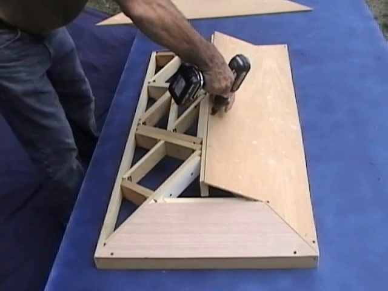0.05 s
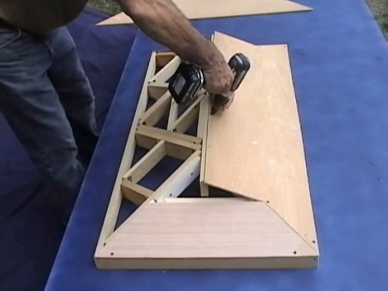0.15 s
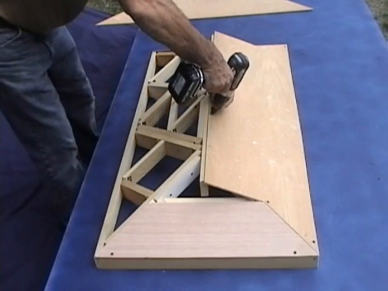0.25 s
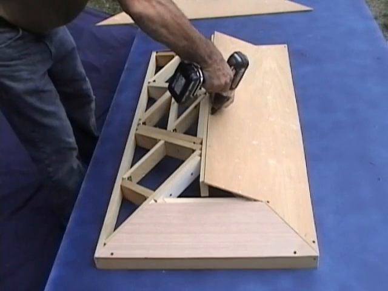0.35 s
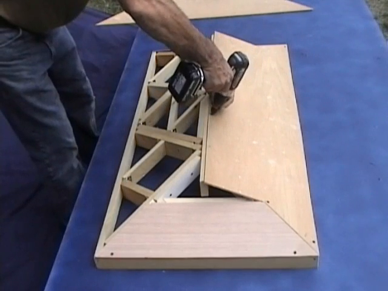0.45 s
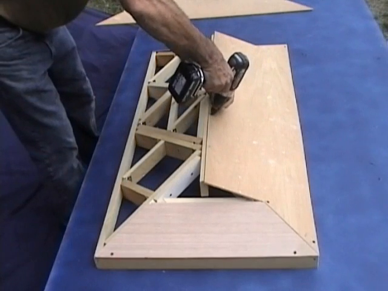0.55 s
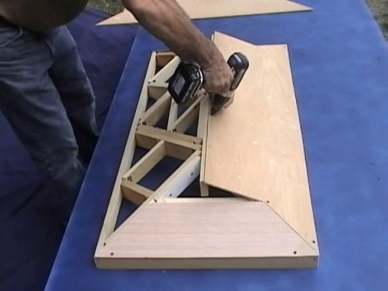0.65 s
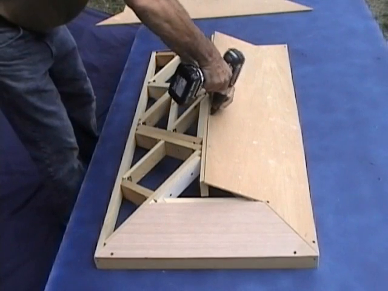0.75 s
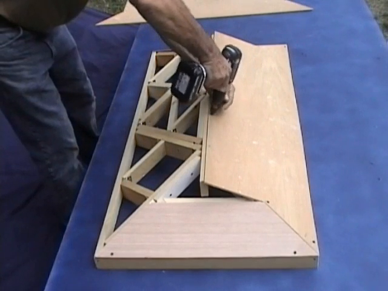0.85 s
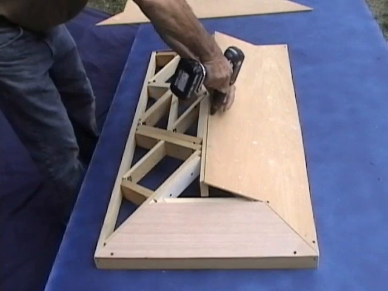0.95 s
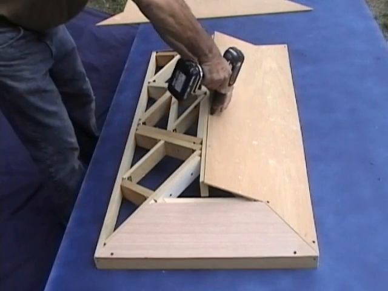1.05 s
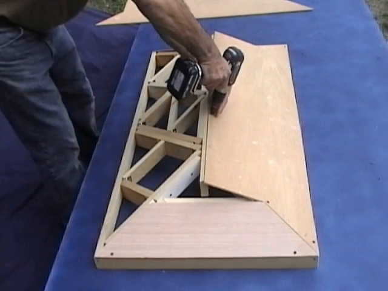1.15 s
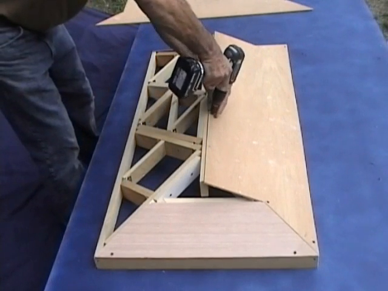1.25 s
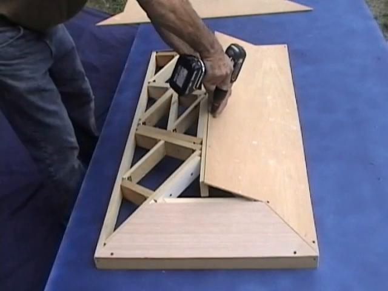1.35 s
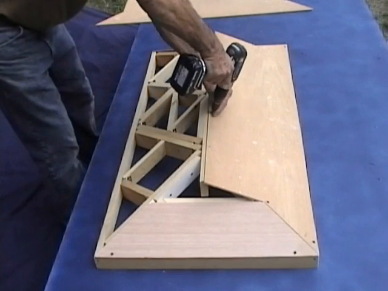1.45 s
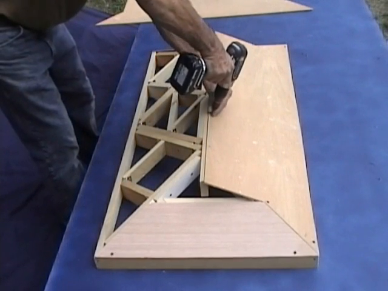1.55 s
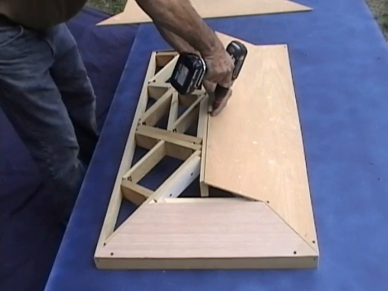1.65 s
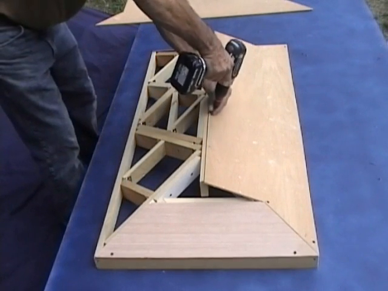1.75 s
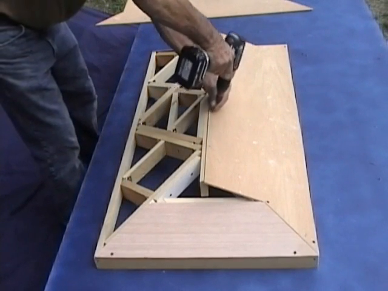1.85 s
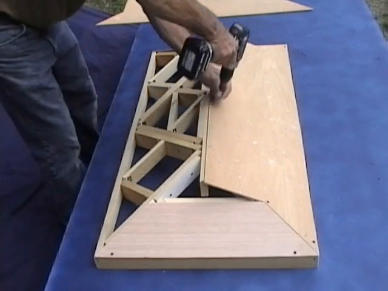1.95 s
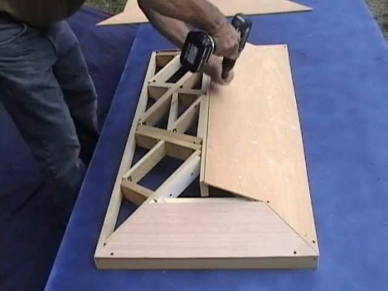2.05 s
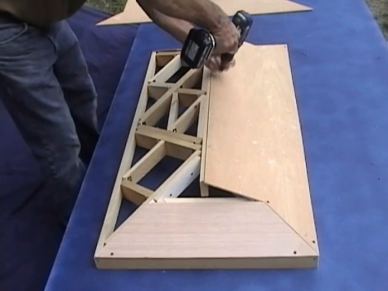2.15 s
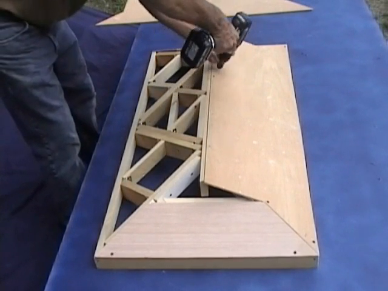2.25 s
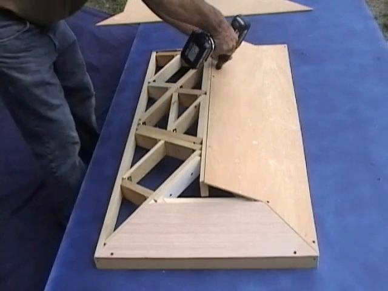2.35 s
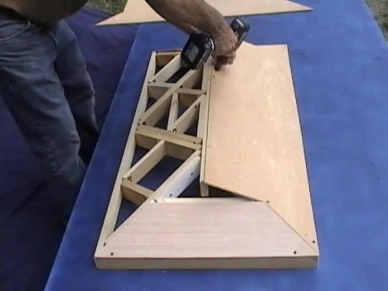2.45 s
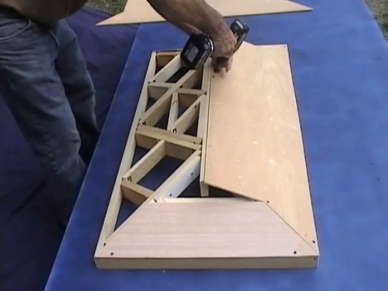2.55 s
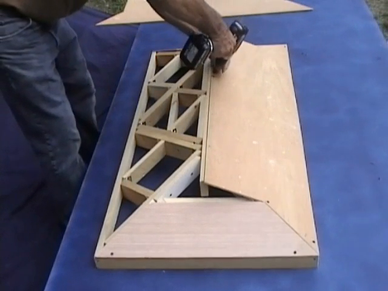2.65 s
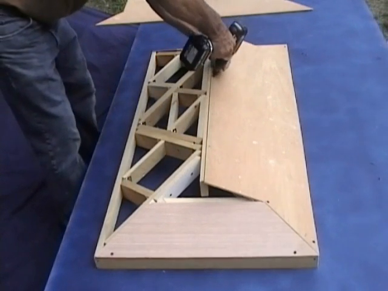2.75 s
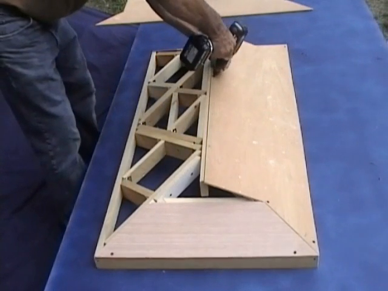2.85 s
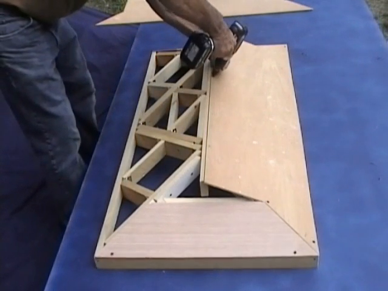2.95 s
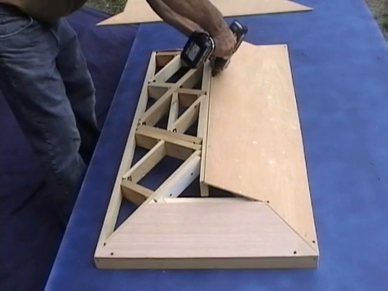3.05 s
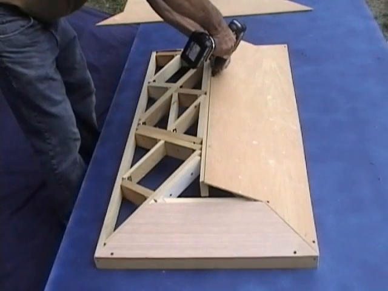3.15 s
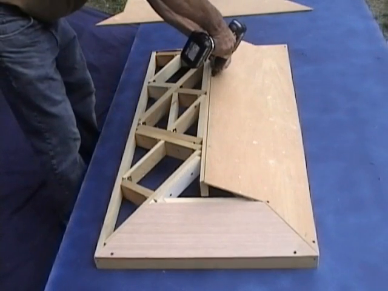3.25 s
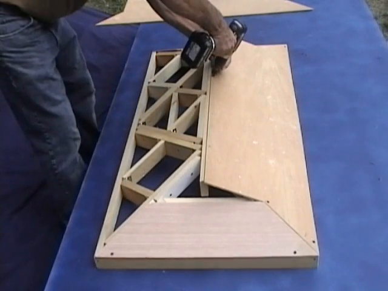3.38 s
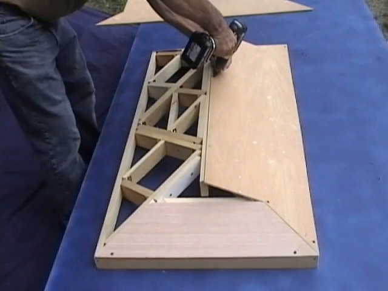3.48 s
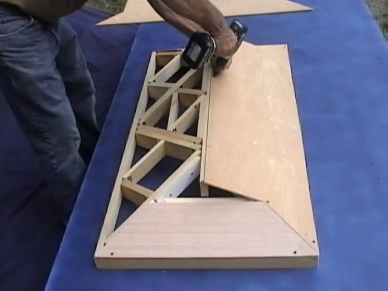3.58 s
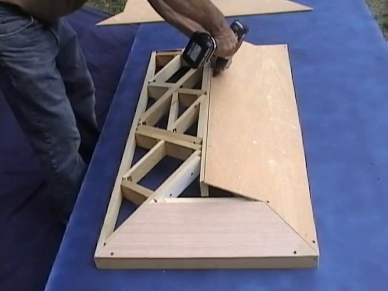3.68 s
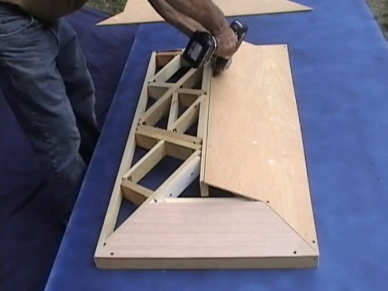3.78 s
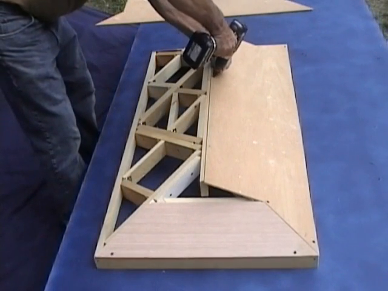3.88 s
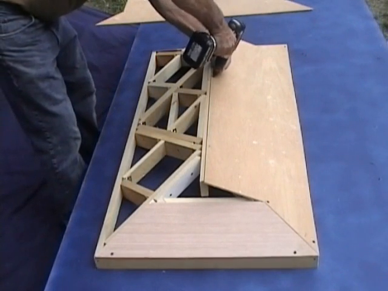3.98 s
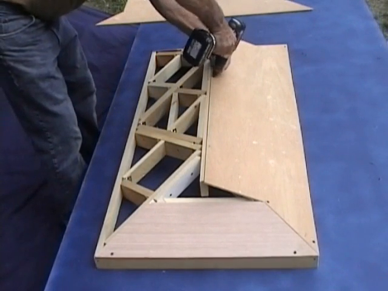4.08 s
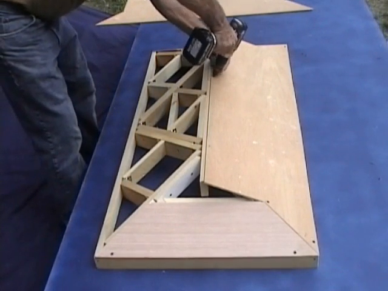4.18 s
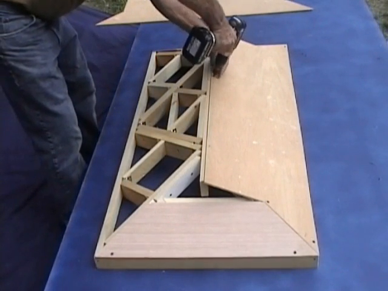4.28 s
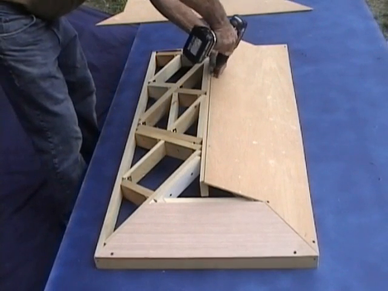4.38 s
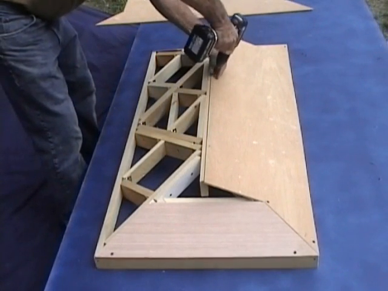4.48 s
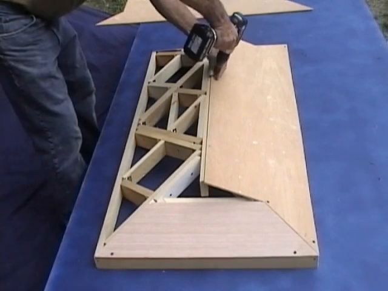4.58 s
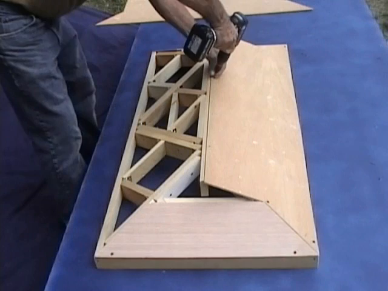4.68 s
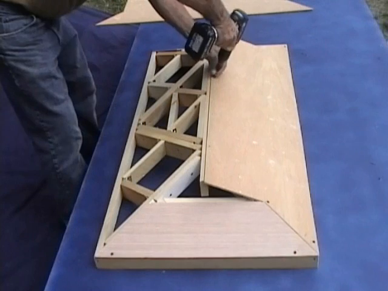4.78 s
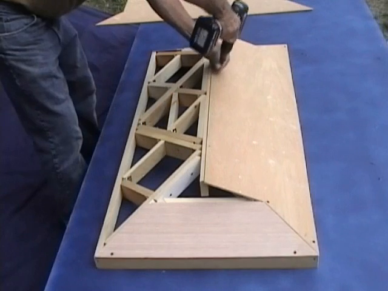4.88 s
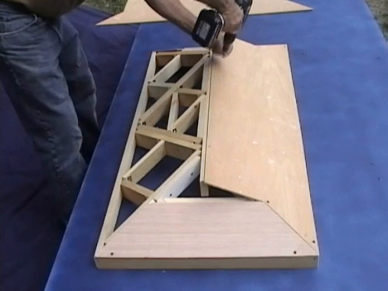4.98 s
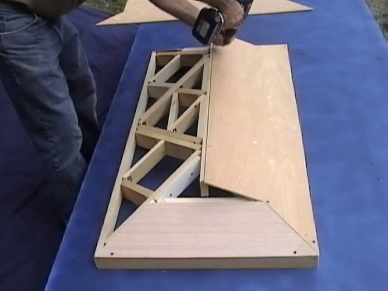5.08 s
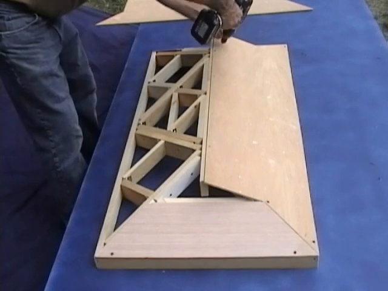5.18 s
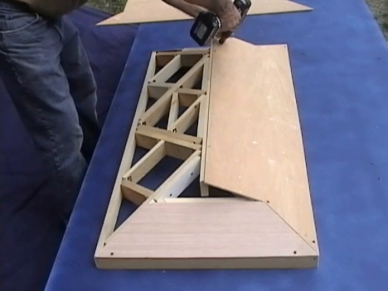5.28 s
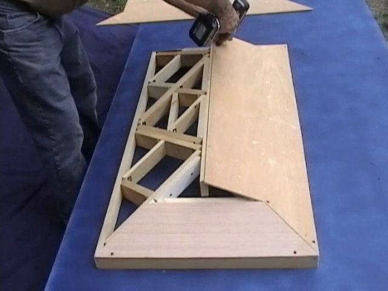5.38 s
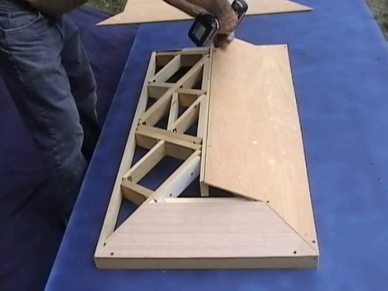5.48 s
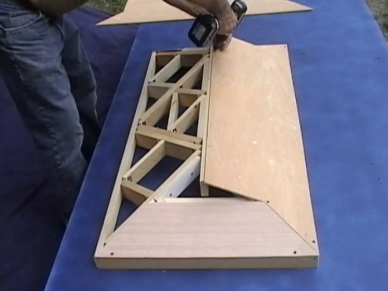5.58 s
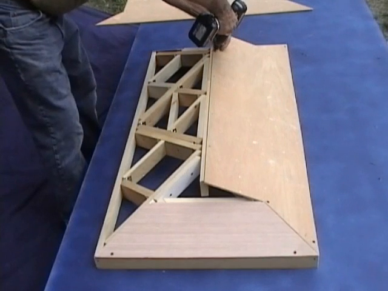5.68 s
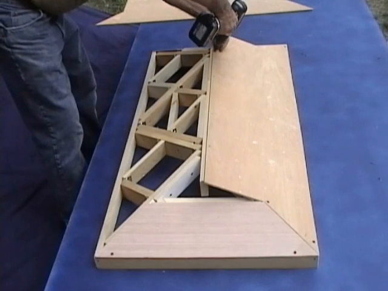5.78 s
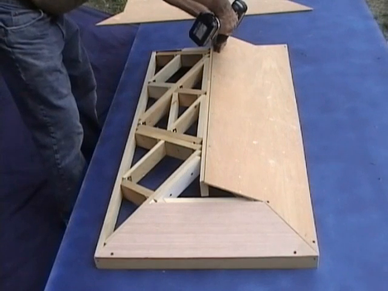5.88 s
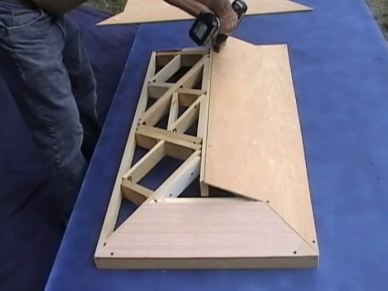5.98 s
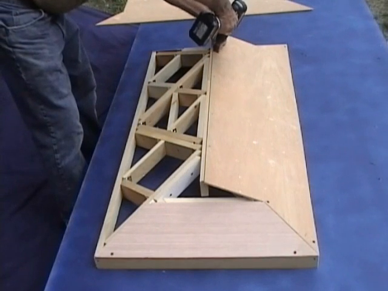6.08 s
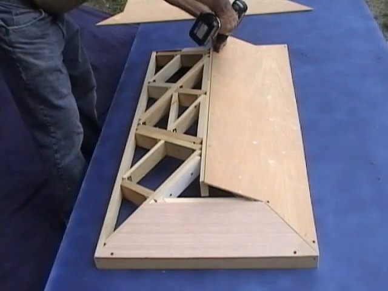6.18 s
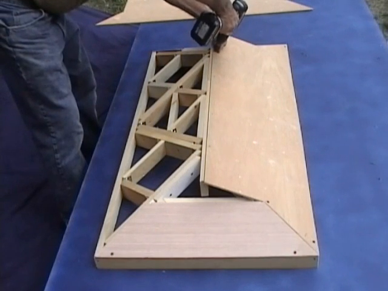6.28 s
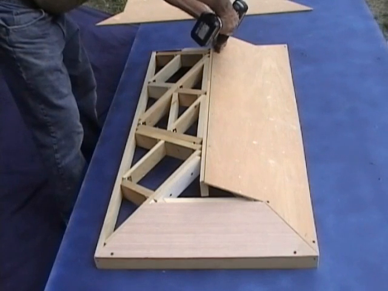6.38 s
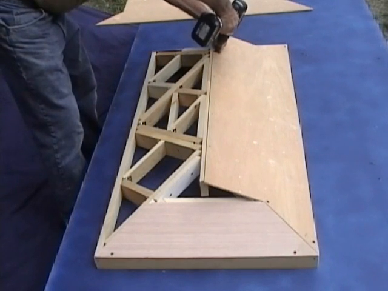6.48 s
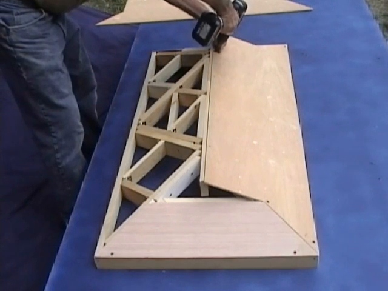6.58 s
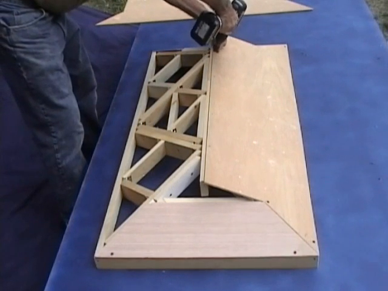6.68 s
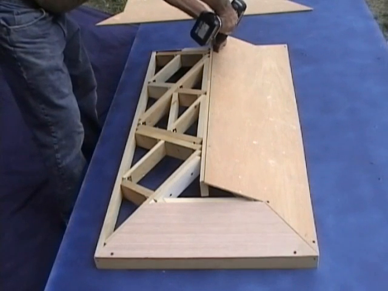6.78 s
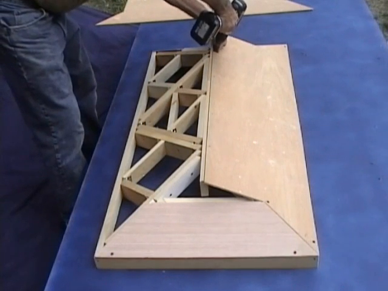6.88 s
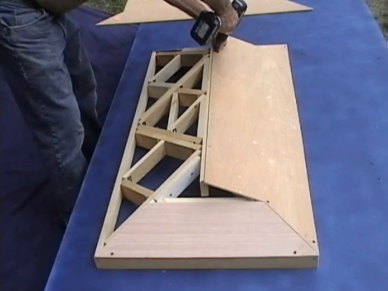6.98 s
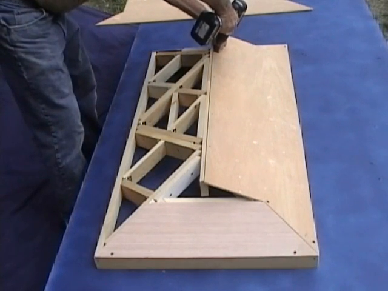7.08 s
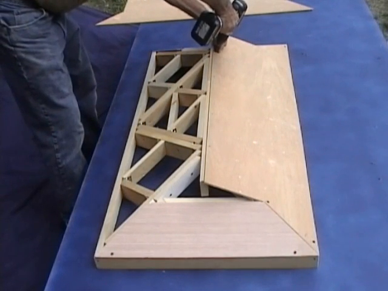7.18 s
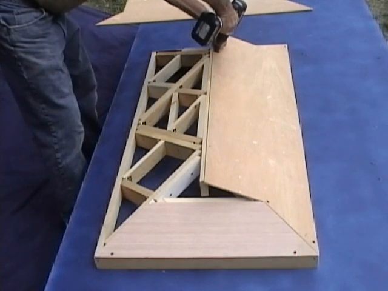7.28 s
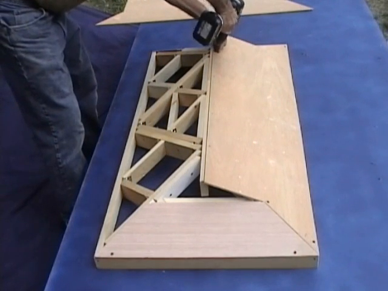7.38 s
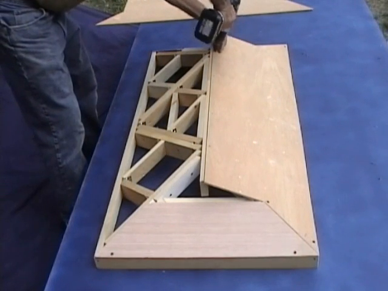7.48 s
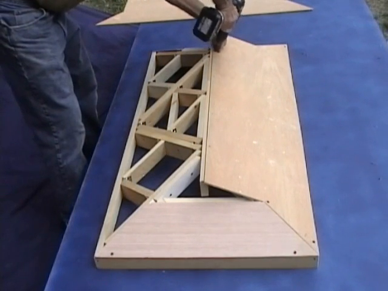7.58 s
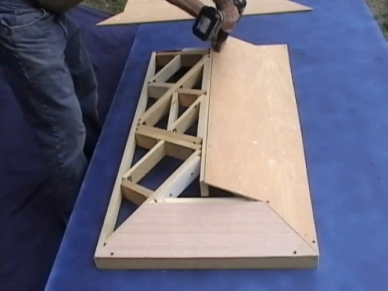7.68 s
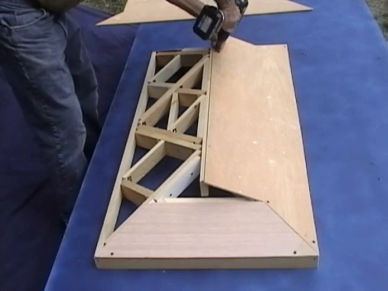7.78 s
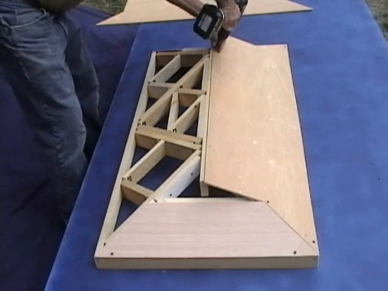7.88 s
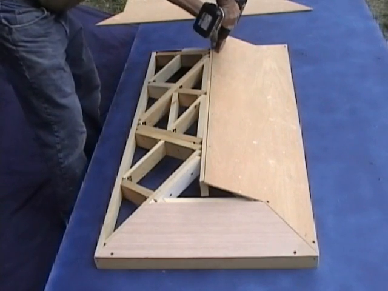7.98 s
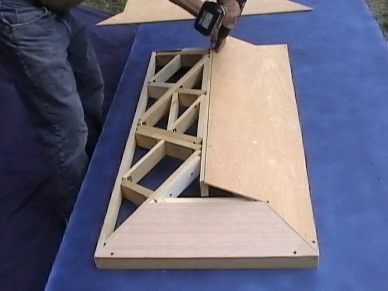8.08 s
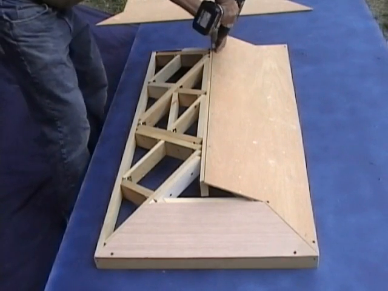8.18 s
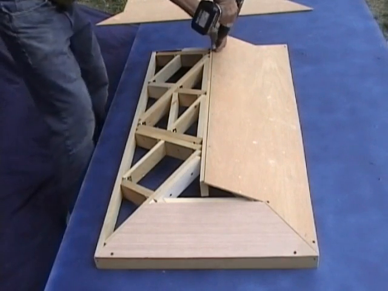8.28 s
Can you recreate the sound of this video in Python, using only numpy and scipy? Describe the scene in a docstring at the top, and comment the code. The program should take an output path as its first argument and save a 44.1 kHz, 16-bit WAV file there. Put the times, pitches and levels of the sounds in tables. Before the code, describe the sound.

Close, stereo, outdoors: bit and hand knock on a hollow plywood panel, then a cordless drill runs for about a second, its screw groaning, and stops with a hard clack. After a pause with a few knocks it clicks onto a second screw and whirs again, stopping abruptly. Scattered light knocks follow, then a third burst still running at the end. Tiny birds twitter faintly over a low murmur.

```python
"""Bit and hand knock on a plywood panel on a hollow wooden frame: decaying panel modes plus a noisy clack and tick.
Then a cordless drill backs out three screws, the third still turning at the end. Its shaft phase drives
gear whine, tones, rasp and hum; the first screw groans, and the chuck clacks as the brake stops the drill.
Small birds, swept sines, twitter faintly over a low outdoor murmur of coloured noise and two faint steady tones.
The camera's comb filter cuts narrow notches into everything."""
import sys
import numpy as np
from scipy import signal
from scipy.fft import rfft, irfft, next_fast_len
from scipy.io import wavfile
from scipy.ndimage import uniform_filter1d, map_coordinates

SR = 44100
rng = np.random.default_rng(int(sys.argv[2]) if len(sys.argv) > 2 else 0)


def put_to_file(sound):
    """Save the sound as 16-bit audio at rate SR, in the file named by the first command-line argument."""
    columns = np.atleast_2d(sound).T  # one column per channel
    safe = np.clip(columns, -1, 1)
    whole_steps = np.round(safe * 32767)
    wavfile.write(sys.argv[1], SR, whole_steps.astype(np.int16))


N = 367794
TIME = np.arange(N) / SR  # s


def amp(db):
    """Decibels to gain."""
    return 10 ** (np.asarray(db) / 20)


def unit(x):
    """Scale to rms 1."""
    return x / np.sqrt(np.mean(x ** 2) + 1e-20)


def crest(x):
    """Scale so that the loudest 10 ms have rms 1."""
    return x / np.sqrt(uniform_filter1d(x ** 2, size=441).max() + 1e-20)


def sine(pitch_hz):
    """Sine that follows a pitch curve, peak 1."""
    return np.sin(2 * np.pi * np.cumsum(pitch_hz) / SR)


def along(points, hz):
    """Interpolate (Hz, value) points on a log frequency axis."""
    f, v = np.transpose(points)
    return np.interp(np.log(hz + 1), np.log(f + 1), v)


def lifts(humps, hz):
    """Gain in dB of (Hz, width Hz, lift dB) resonances."""
    return sum(db / (1 + (2 * (hz - centre) / width) ** 2) for centre, width, db in humps)


def curves(rows):
    """One value per sample for each column after the time."""
    s, *cols = np.transpose(rows)
    return [np.interp(TIME, s, c) for c in cols]


def wobble(rate):
    """Smooth random curve, rate knots a second."""
    knots = rng.standard_normal(int(N * rate / SR) + 4)
    coarse = TIME[::32]
    return np.interp(TIME, coarse, map_coordinates(knots, [coarse * rate]))


def filtered(x, response):
    """x through a complex response of frequency."""
    n = x.shape[-1]
    m = next_fast_len(n + 8192)
    return irfft(rfft(x, m) * response(np.fft.rfftfreq(m, 1 / SR)), m)[..., :n]


def noise(spectrum, size):
    """Noise of rms 1 with the given colour."""
    return unit(filtered(rng.standard_normal(size), lambda hz: amp(along(spectrum, hz))))


def add(track, s, sound):
    """Mix a sound into a track at time s."""
    part = track[max(round(s * SR), 0):][:len(sound)]
    part += sound[:len(part)]


def drill():
    """One shaft drives the gears and the hum that the screw passes to the panel; the thread rubs."""
    speed, torque = shaft()
    rasp_db, whine_db, hum_db, rub_db = efforts(speed, torque)
    # a half-pulled trigger holds the speed less well
    hunting = 1 + 5 * np.minimum(np.abs(1 - speed / FULL_HZ), 0.3)
    unsteady = 0.003 * wobble(14) + 0.002 * wobble(45)
    angle = 2 * np.pi * np.cumsum(speed * (1 + hunting * unsteady)) / SR
    whine = gear_whine(angle)
    tones = gear_tones(angle, speed)
    rasp = gear_rasp(angle)
    hum = np.sqrt(2) * np.sin(angle) * amp(3.1 * wobble(23) - 0.5)
    rub = thread_rub()
    gears = amp(rasp_db - 0.5) * (rasp + tones) + amp(whine_db) * whine
    return gears + amp(hum_db) * hum + amp(rub_db) * rub


def gear_whine(angle, teeth=10):
    """Tooth meshing sounds at a multiple of the shaft speed, with a flickering level."""
    return np.sqrt(2) * np.sin(teeth * angle) * amp(2 - 3.5 * np.abs(wobble(22)))


# Weaker gear tones. Each row: multiple of the shaft speed, level in dB against the rasp at top speed.
GEAR_TONES = [(7, -21.5), (9, -18), (11, -17.5), (14, -16.5), (19, -23), (20, -14), (21, -30), (23, -19.5),
              (30, -22), (40, -22)]


def gear_tones(angle, speed, level_wobble_db=3, slow_lift_db=15):
    """Multiples of the shaft speed, stronger against the rasp when the shaft is slow."""
    tones = 0
    for multiple, db in GEAR_TONES:
        level = amp(db + level_wobble_db * wobble(18))
        tones = tones + level * np.sin(round(multiple) * angle + rng.uniform(0, 2 * np.pi))
    return tones * np.sqrt(2) * amp(slow_lift_db * np.minimum(1 - speed / speed.max(), 0.28))


# Gearbox colour. Each row: frequency in Hz, relative level in dB per Hz.
RASP_COLOUR = [(470, -44), (800, -12.5), (1040, -27), (1280, -12.5), (1810, -13), (2160, -8), (2350, -6),
               (2490, -10.5), (3310, -6), (4340, -12), (4720, -11.5), (5060, -10.5), (9360, -12.5),
               (11900, -27), (13500, -41.5)]
# Gearbox resonances. Each row: centre in Hz, width in Hz, lift in dB.
HOUSING_RESONANCES = [(2630, 37, 4), (3160, 91, 1.5), (3330, 61, 0), (3930, 270, 4), (4990, 57, 3.5),
                      (5500, 45, -0.5)]


def gear_rasp(angle, rattle_db=-9, throb=0.082, grain_db=1.35):
    """Uneven teeth: noise plus a rough pattern every second turn, coloured by the gearbox."""
    pattern = rng.standard_normal(512)
    place = angle / (4 * np.pi) % 1 * len(pattern)
    rattle = np.interp(place, np.arange(len(pattern)), pattern)
    teeth = rng.standard_normal(N) + amp(rattle_db) * unit(rattle)
    teeth = teeth * (1 + throb * np.sin(angle)) * amp(grain_db * wobble(400))
    return unit(filtered(teeth, lambda hz: amp(along(RASP_COLOUR, hz) + lifts(HOUSING_RESONANCES, hz))))


# Thread rubbing in the wood. Each row: frequency in Hz, relative level in dB per Hz.
RUB_COLOUR = [(60, -13), (120, -13.5), (200, 1.5), (400, 1), (540, 0), (700, -2), (900, -8.5), (1500, -17),
              (3000, -60)]


def thread_rub():
    """Thread friction: low coloured noise of unsteady level."""
    return unit(noise(RUB_COLOUR, N) * amp(1.9 * wobble(35)))


FULL_HZ = 235  # reference shaft speed
# Trigger moves. Each row: start in seconds, shaft speed asked for in Hz, shaft lag in seconds.
# A speed of 0 Hz or less sets the brake.
TRIGGER_MOVES = [(0.96, 175, .012), (1.252, 234.5, .026), (1.55, 237, 0.052), (1.83, -0.5, 0.059),
                 (4.108, 228, 0.033), (4.42, 233, .15), (4.84, 205, 0.043), (4.896, 0, .045),
                 (7.57, 237.5, 0.017), (7.702, 160.5, .085), (7.836, 236, .018)]


def shaft():
    """The shaft chases the speed asked for; a positive gap is the motor's torque."""
    speed, asked = np.zeros(N), np.zeros(N)
    for s, hz, lag in TRIGGER_MOVES:
        i = round(s * SR)
        asked[i:] = hz
        speed[i:] = hz + (speed[i] - hz) * np.exp(-np.minimum(TIME[:N - i] / lag, 20))
    return np.maximum(speed, 1), np.maximum(asked - speed, 0) / FULL_HZ


SPEED_POWER, STRAIN_DB = 4.54, 25  # level grows as this power of speed; lift at full torque
WHINE_DB, HUM_DB = -34.5, -43  # at FULL_HZ under a light hand, before flicker
RUB_HOLD_DB = 7  # the thread rubs fully until the drive has sunk this far
LEAN_ATTACK_S, LEAN_RELEASE_S = 0.03, 0.11
# The three screws. Each row: start in seconds, rasp at FULL_HZ in dB before a 0.5 dB cut,
# thread rubbing in dB, its fall as the screw comes out in dB per second.
SCREW_GRIP = [(0.95, -20.5, -31, 0), (4.1, -21.5, -27, 12), (7.55, -22.5, -22.5, 19.5)]
# The hand leans on the drill. Each row: start in seconds, length in seconds,
# lift of the whine in dB, lift of the hum in dB.
HAND_LEANS = [(1.279, .13, 10.5, 18), (1.472, 0.088, 4.5, 15.5), (4.215, 0.17, 11, -9),
              (4.428, 0.16, 14, 9.5), (4.658, 0.18, 7.5, 1.5), (7.595, 0.11, 6.5, 4), (7.845, .16, 9.5, 10),
              (8.169, 0.071, 9, -6)]


def efforts(speed, torque):
    """Levels in dB of rasp, whine, hum and rub from speed, torque, the screw's grip and the hand's weight."""
    drive_db = SPEED_POWER * 20 * np.log10(speed / FULL_HZ) + STRAIN_DB * torque
    screws = np.array(SCREW_GRIP)
    current = np.maximum(np.searchsorted(screws[:, 0], TIME) - 1, 0)
    start, rasp_db, grip_db, fall = screws[current].T
    whine_db, hum_db = WHINE_DB + drive_db, HUM_DB + drive_db
    for s, length, whine_lift, hum_lift in HAND_LEANS:
        attack = (TIME - s) / LEAN_ATTACK_S
        release = 1 - (TIME - s - length) / LEAN_RELEASE_S
        weight = np.clip(np.minimum(attack, release), 0, 1)
        whine_db = whine_db + whine_lift * weight
        hum_db = hum_db + hum_lift * weight
    rub_db = grip_db - fall * (TIME - start) + np.minimum(drive_db + RUB_HOLD_DB, 0)
    return rasp_db + drive_db, whine_db, hum_db, rub_db


# The first screw turns in the wood. Each row: time in seconds, pitch in Hz, level in dB, both before wobble.
GROAN_CURVE = [(.97, 605, -74), (1.02, 593.6, -24), (1.12, 582, -37), (1.21, 582, -30.5), (1.3, 560, -34.5),
               (1.45, 549.5, -31), (1.58, 551, -36.5), (1.8, 544, -35), (1.87, 545, -95)]


def groan(waver=0.021):
    """The thread sticks and slips: a tone of unsteady pitch and level."""
    pitch, db = curves(GROAN_CURVE)
    level = amp(db + 4.1 * wobble(39.6)) * np.sqrt(2)
    return level * sine(pitch * (1 + waver * wobble(70)))


RUNNING_DAMPING = 0.9  # the running drill shortens the panel's ring by this factor
STRIKE_TIME = np.arange(SR // 3) / SR  # s
# Blows of bit and hand on the panel. Each row: time in seconds, level in dB, frequency that the struck
# spot favours in Hz, hardness (contact against wood) in dB, contact build-up in seconds.
PANEL_BLOWS = [(0.028, -18, 860, -4, 0.0034), (0.04, -15.5, 435, -24, 0.0038),
               (0.177, -44.5, 330, 0.5, 0.0044), (0.23, -39.5, 456, -24, 0.0029),
               (0.416, -43, 540, -22, 0.0065), (0.531, -34, 560, -25, .012),
               (0.579, -25.5, 615, -7, 0.0055), (0.605, -25, 600, -32, 0.0028),
               (0.638, -20.5, 474, -16.5, 0.0074), (0.88, -36, 570, -5.5, 0.0044),
               (0.972, -28.5, 666, -2, 0.011), (1.017, -11, 424, -8, 0.0091),
               (1.052, -20.5, 234, -7, 0.0053), (2.803, -15.5, 830, -16.5, 0.0061),
               (3.017, -30.5, 343, -13, 0.0081), (3.043, -34, 287, -10, 0.0041),
               (3.662, -20.5, 784, -10.5, 0.0048), (3.818, -19, 840, -18, 0.0062),
               (3.826, -15.5, 550, -16, 0.0053), (3.867, -49, 220, -17, 0.012),
               (4.07, -35.5, 553, -10, .011), (4.164, -12, 407, -4, 0.0089), (5.696, -27, 350, -16, 0.0057),
               (5.806, -31.5, 398, -7, 0.0048), (6.251, -27, 590, -6.5, 0.0067),
               (6.402, -19, 780, -5, 0.0042), (6.474, -21, 460, -.5, 0.028),
               (6.519, -30.5, 500, -19, 0.0021), (6.703, -23.5, 610, -9.5, 0.013),
               (6.735, -26, 550, -9, 0.0033), (6.783, -29.5, 360, -11.5, 0.0052),
               (7.197, -26, 736, -7, 0.004), (7.255, -25.5, 540, -6, 0.0092),
               (7.295, -28, 500, -17, 0.0047), (7.358, -32.5, 570, -13, 0.0045),
               (7.529, -36, 400, -7, 0.0047), (7.588, -18.5, 377, -3.5, 0.022),
               (7.661, -13, 365, -1.5, 0.0039), (7.722, -15, 370, -2, .004),
               (7.748, -23.5, 320, -13, 0.0059)]


def knocks():
    """Each blow rings the panel and clacks; the running drill damps the ring."""
    track = np.zeros(N)
    running = shaft()[0] > FULL_HZ / 2
    for s, db, spot_hz, hardness_db, build in PANEL_BLOWS:
        wood = panel(STRIKE_TIME, spot_hz, build, RUNNING_DAMPING if running[round(s * SR)] else 1)
        hard = contact(STRIKE_TIME, build * 0.84, tick_db=-14)
        add(track, s, amp(db) * (wood + amp(hardness_db) * hard))
    return track


# The chuck locks as the brake bites. Each row: time in seconds, level in dB.
CHUCK_LOCKS = [(1.841, -20), (4.884, -17), (4.896, -24)]


def chuck_locks(rise_s=0.0024, tick_db=-1.5, panel_db=-19, spot_hz=890):
    """The locking chuck clacks hard and shakes the panel a little."""
    track = np.zeros(N)
    for s, db in CHUCK_LOCKS:
        wood = panel(STRIKE_TIME, spot_hz, rise_s, RUNNING_DAMPING)
        add(track, s, amp(db) * (contact(STRIKE_TIME, rise_s, tick_db) + amp(panel_db) * wood))
    return track


# Bit and chuck click. Each row: time in seconds, level in dB, t60 in seconds.
CLICK_TIMES = [(0.0286, -30.5, .02), (0.97, -33, 0.024), (1.036, -17, 0.027), (1.057, -25, 0.014),
               (1.841, -22, 0.013), (2.905, -46, .03), (3.824, -32, 0.049), (4.105, -41.5, 0.029),
               (4.167, -12.5, 0.049), (4.899, -16.5, 0.01), (5.74, -43.5, .03)]


def steel_clicks():
    """Small steel parts click: bright noise with an instant start and a short decay."""
    track = np.zeros(N)
    for s, db, t60 in CLICK_TIMES:
        click = noise(TICK_COLOUR, len(STRIKE_TIME)) * amp(-60 * STRIKE_TIME / t60)
        add(track, s, amp(db) * crest(click))
    return track


def swell(t, rise, t60):
    """A contact builds up, then dies away."""
    return (1 - np.exp(-(t / rise) ** 2)) * amp(-60 * t / t60)


THUMP_DB, THUMP_SPOT_HZ, THUMP_DB_PER_OCTAVE = -0.5, 390, 7  # stiffer spots, over a rib, thump less
# The panel on its frame. Each row: mode in Hz, relative level in dB, undamped t60 in seconds;
# each blow scatters frequency and level.
PANEL_MODES = [(98.2, -21.5, 0.38), (120.5, -12, 0.26), (172.3, -3, 0.18), (203.6, 0, 0.17),
               (229.5, -3, 0.14), (273.7, -2.5, 0.092), (338.5, -5, 0.14), (403, -1, 0.12), (496, 3, 0.055),
               (534, -1, 0.1), (568.6, -4.5, 0.074), (638, -6, 0.11), (683, -8.5, 0.13),
               (714.3, -5.5, 0.11), (801, -2.5, 0.078), (843.8, -4, 0.13), (923, -8.5, 0.081),
               (1123, -10, 0.081)]


def panel(t, spot_hz, build, damping, scatter_db=2, favour_db=8.5, favour_width=0.2, split_hz=305):
    """A blow rings the modes at new strengths; slow bending waves make the low ones bloom last."""
    hz, level, t60 = np.transpose(PANEL_MODES)[:, :, None]
    low = hz[:, 0] < split_hz
    spot_db = favour_db * np.exp(-(np.log(hz / spot_hz) / favour_width) ** 2)
    strength = amp(level + spot_db + scatter_db * rng.standard_normal(hz.shape))
    pressed = hz * (1 + 0.022 * rng.standard_normal(hz.shape))  # the weight of the hand detunes the modes
    phase = rng.uniform(0, 2 * np.pi, hz.shape)
    envelope = swell(t, build * (1000 / hz) ** 0.39, t60 * damping)
    modes = strength * envelope * np.sin(2 * np.pi * pressed * t + phase)
    thump_db = THUMP_DB - THUMP_DB_PER_OCTAVE * np.log2(spot_hz / THUMP_SPOT_HZ)
    return amp(thump_db) * crest(modes[low].sum(0)) + crest(modes[~low].sum(0))


# Clack of hard parts. Each row: frequency in Hz, relative level in dB per Hz.
CLACK_COLOUR = [(700, -15.5), (1000, -0.5), (1420, 4.5), (1730, 2.5), (2100, -2.5), (2800, -11),
                (3600, -10.5), (5000, -43)]
# Brighter tick, also the steel clicks. Each row: frequency in Hz, relative level in dB per Hz.
TICK_COLOUR = [(2500, -2.5), (3800, 2), (6000, -2.5), (9500, -8.5), (12000, -30.5), (14000, -42)]


def contact(t, rise, tick_db, clack_t60=0.072, tick_t60=0.044):
    """Hard parts meet with a clack and a shorter, brighter tick."""
    clack = noise(CLACK_COLOUR, len(t)) * swell(t, rise, clack_t60)
    tick = noise(TICK_COLOUR, len(t)) * swell(t, rise * 0.79, tick_t60)
    return crest(clack) + amp(tick_db) * crest(tick)


# First bird. Each row: start in seconds, length in seconds, top pitch in Hz before stray,
# fall over the trill in Hz, level in dB before doubling.
TRILL_CALLS = [(0.039, 0.4, 7600, 390, -59.5), (2.217, 0.47, 7680, 450, -57.5),
               (2.915, 0.16, 7600, 102, -53), (3.77, 0.26, 7830, 250, -49.5), (5.231, 0.29, 7680, 348, -54),
               (5.601, 0.19, 7880, 248, -51.5), (6.541, 0.18, 7800, 100, -57.5),
               (6.923, 0.27, 7830, 500, -55)]


def bird_trills(notes_per_s=41, arch_hz=1300, stray_hz=150):
    """One bird trills in quick arched notes, each slightly off pitch."""
    track = np.zeros(N)
    for s, length, top_hz, fall_hz, db in TRILL_CALLS:
        u = np.linspace(0, 1, int(length * SR))
        note = u * length * notes_per_s
        stray = rng.normal(0, stray_hz, 64)[note.astype(int)]
        arch = arch_hz * (2 * (note % 1) - 1.1) ** 2
        pitch = top_hz - fall_hz * u + stray - arch
        shape = np.sin(np.pi * note) ** 2 * np.abs(np.sin(np.pi * u)) ** 0.5
        add(track, s, amp(db) * 2 * shape * sine(pitch))
    return track


# Third bird. Each row: start in seconds, middle pitch in Hz, level in dB.
WHISTLE_CALLS = [(5.04, 4280, -58), (5.55, 4700, -56), (6.975, 4690, -51)]


def bird_whistles():
    """A third bird whistles for 40 ms at a time, falling 200 Hz."""
    track = np.zeros(N)
    u = np.linspace(0, 1, SR // 25)
    for s, hz, db in WHISTLE_CALLS:
        add(track, s, amp(db) * np.sin(np.pi * u) ** 2 * sine(hz + 200 * (0.5 - u)))
    return track


# Second bird's level. Each row: time in seconds, level in dB.
CHIP_LEVEL = [(0, -59), (2.5, -56), (2.9, -61), (3.1, -74), (3.4, -58), (6.2, -57), (6.4, -90), (8.34, -90)]


def bird_chips(chips_per_s=16, top_hz=9000, slur_hz=900):
    """A second bird repeats a thin falling chip in a long chain."""
    # each chip fills 42 % of its period
    chip = np.minimum((TIME * chips_per_s + 0.1 * wobble(3)) % 1 / 0.42, 1)
    pitch = top_hz - slur_hz * chip ** 2 + 50 * wobble(24)
    return amp(curves(CHIP_LEVEL)[0]) * np.sin(np.pi * chip) * sine(pitch)


def spread(x, spread_db=-8, corner_hz=6500):
    """Short waves scatter off nearby edges and reach the two microphones differently."""
    scatter = rng.standard_normal(900) * np.linspace(1, 0, 900) ** 2
    side = signal.fftconvolve(x, scatter / np.linalg.norm(scatter))[:N]
    side = amp(spread_db) * filtered(side, lambda hz: hz ** 2 / (hz ** 2 + corner_hz ** 2))
    return np.array([x + side, x - side])


# Decay of the surroundings. Each row: frequency in Hz, t60 in seconds.
YARD_DECAY = [(150, 0.79), (600, 0.38), (2500, 0.13), (10000, 0.16)]


def echoes(x, apart_hz=2500):
    """Nearby surfaces answer; the bass reaches both microphones alike, the treble differently."""
    hz, t, z = signal.stft(rng.standard_normal((2, SR // 2)), SR, nperseg=256)
    decay = amp(-60 * t / along(YARD_DECAY, hz)[:, None])
    tail = signal.istft(z * decay, SR, nperseg=256)[1]
    mid, side = tail / np.linalg.norm(tail[0])
    side = filtered(side, lambda f: f / (f + apart_hz))
    late = np.pad(x, (200, 0))[None]  # 4.5 ms
    return signal.fftconvolve(late, np.array([mid + side, mid - side]), axes=1)[:, :N]


# Outdoor murmur. Each row: time in seconds, level in dB before wobble and colour.
AIR_LEVEL = [(0, -47), (.85, -47), (2, -47), (2.7, -45.5), (3.5, -45), (5, -43), (5.6, -39.5),
             (6.15, -41.5), (7.05, -42), (8.34, -38.5)]
# Murmur colour. Each row: frequency in Hz, relative level in dB per Hz.
MURMUR_COLOUR = [(15, -36), (25, -2), (82, -1.5), (217, -5.5), (305, -12.5), (418, -9.5), (453, -12),
                 (490, -9), (690, -5.5), (1560, -11.5), (4360, -25), (6130, -27), (7570, -28), (11500, -39),
                 (13500, -45)]
# Stereo likeness. Each row: frequency in Hz, left-right correlation.
AIR_LIKENESS = [(60, 0.79), (230, 0.35), (890, 0.92), (3400, 0.82), (13100, 0.081)]
# Narrow humps. Each row: centre in Hz, width in Hz, lift in dB.
AIR_HUMPS = [(3250, 280, 3), (5190, 540, 6), (8050, 270, 7), (10700, 740, 8)]


def air(valley_db=-2, hiss_db=-43.5):
    """A distant murmur slowly swells under a faint hiss of even level."""
    swelling = amp(curves(AIR_LEVEL)[0] + 0.24 * wobble(15))
    pair = noise(MURMUR_COLOUR, (2, N))
    hiss = filtered(pair, lambda hz: hz ** 2 / (hz ** 2 + 5500 ** 2))

    def mid_side(hz):
        turn = np.arccos(np.clip(along(AIR_LIKENESS, hz), -1, 1)) / 2
        valley = valley_db * hz ** 4 / (hz ** 4 + 1800 ** 4)
        return amp(lifts(AIR_HUMPS, hz) + valley) * np.array([np.cos(turn), np.sin(turn)])

    mid, side = filtered((pair - hiss) * swelling + amp(hiss_db) * hiss, mid_side)
    return np.array([mid + side, mid - side])


# Background tones. Each row: frequency in Hz, level in dB before a 3.5 dB lift.
STEADY_TONES = [(64.6, -67), (619.1, -65.5)]


def steady_tones():
    """Two constant sines hum faintly in the background."""
    return sum(amp(db + 3.5) * np.sin(2 * np.pi * hz * TIME + rng.uniform(0, 2 * np.pi))
               for hz, db in STEADY_TONES)


# Stereo balance. Each row: frequency in Hz, left minus right in dB.
STEREO_LEAN = [(40, 4.5), (150, 3.5), (600, 2.5), (1400, -0.3), (4000, .5), (9000, -2), (12500, -1.5)]


def scene():
    """Drill and panel close by, birds far off with stronger echoes."""
    work = drill() + groan() + knocks() + chuck_locks() + steel_clicks()
    song = bird_trills() + bird_whistles() + bird_chips()
    sound = spread(work + song) + echoes(amp(-17) * work + amp(-6.5) * song) + air() + steady_tones()

    def balance(hz):
        left_db = along(STEREO_LEAN, hz) / 2
        return amp(np.array([left_db, -left_db]))

    return filtered(sound, balance)


def record(dry, notch_hz=149.83, depth=0.93, feedback=0.7, top_hz=13650):
    """The camera notches out its motor's harmonics, cuts deep bass, rounds peaks and limits the band."""
    def comb(hz):
        delay = np.exp(-2j * np.pi * hz / notch_hz)
        return 1 - depth * (1 - feedback) * delay / (1 - feedback * delay)

    def bass_cut(hz):
        return hz ** 4 / (hz ** 4 + 35 ** 4)

    x = amp(-1.5) * filtered(dry, lambda hz: comb(hz) * bass_cut(hz))
    x = x / (1 + np.abs(x) ** 6) ** (1 / 6)
    return filtered(x, lambda hz: hz < top_hz)


dry = scene()
out = record(dry)
put_to_file(out)
```